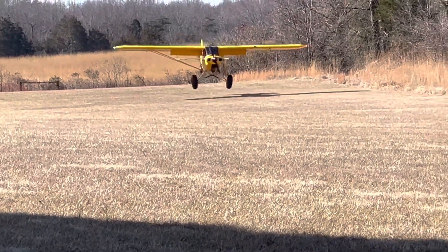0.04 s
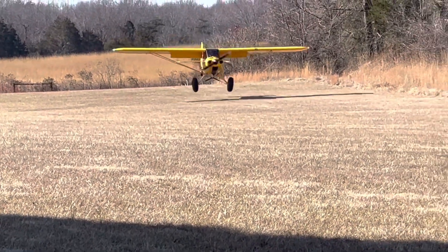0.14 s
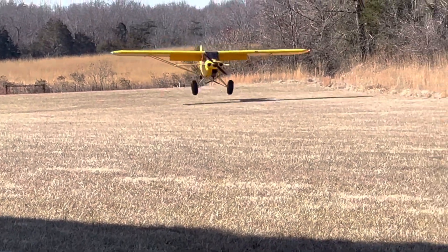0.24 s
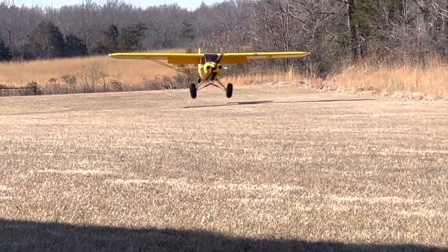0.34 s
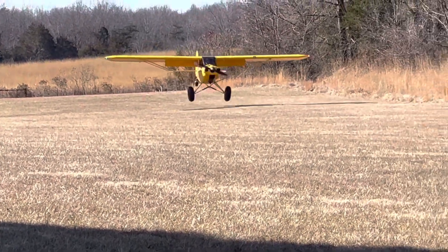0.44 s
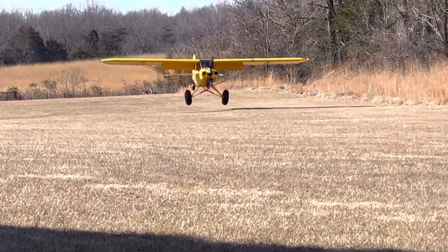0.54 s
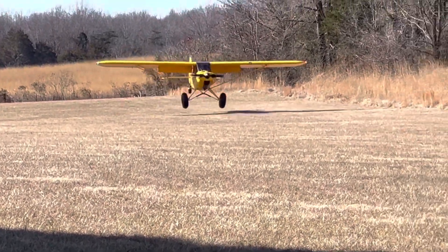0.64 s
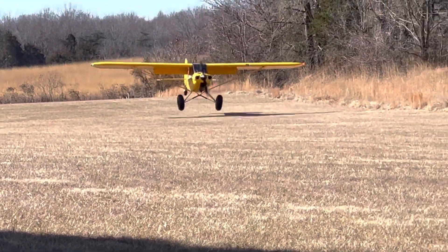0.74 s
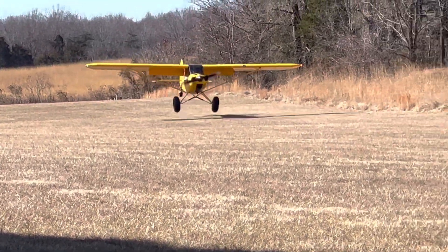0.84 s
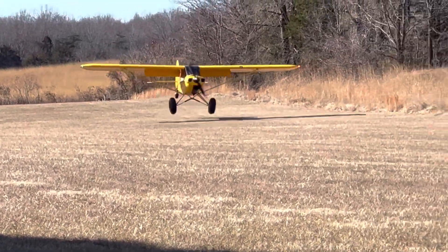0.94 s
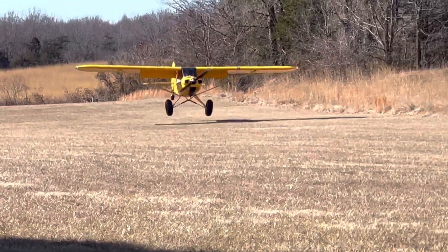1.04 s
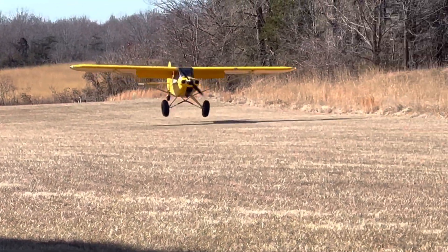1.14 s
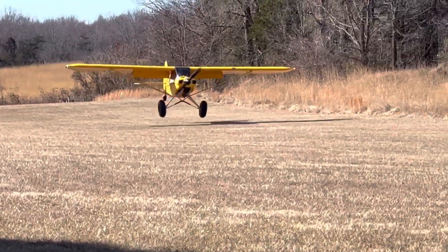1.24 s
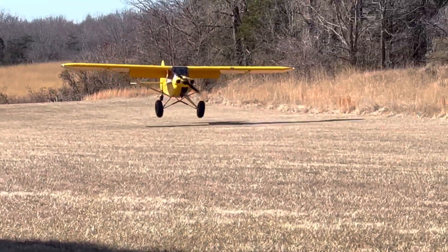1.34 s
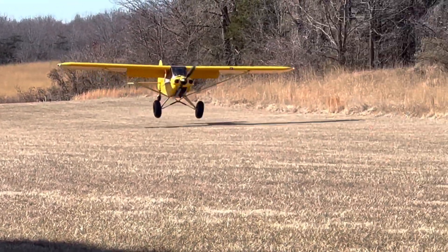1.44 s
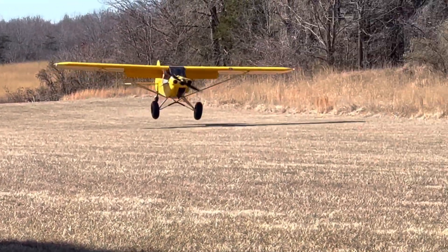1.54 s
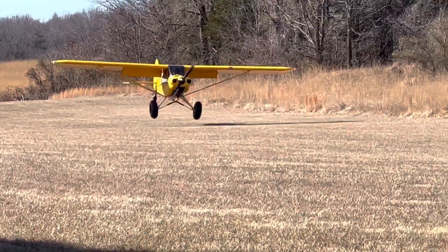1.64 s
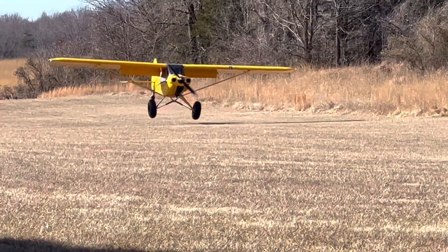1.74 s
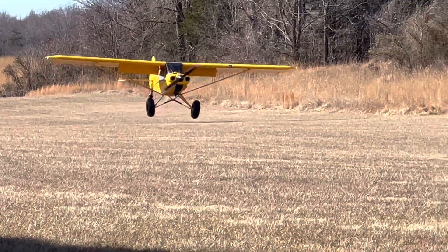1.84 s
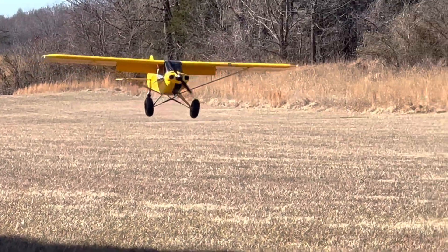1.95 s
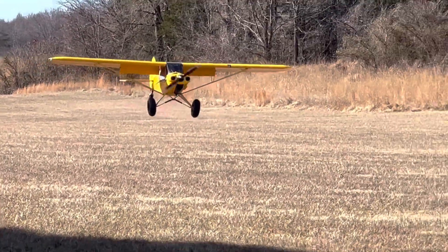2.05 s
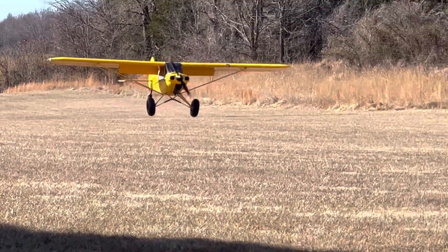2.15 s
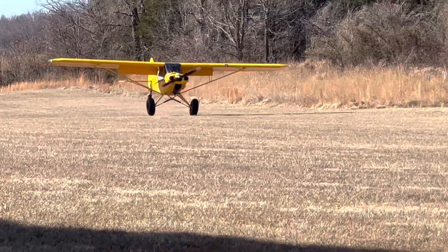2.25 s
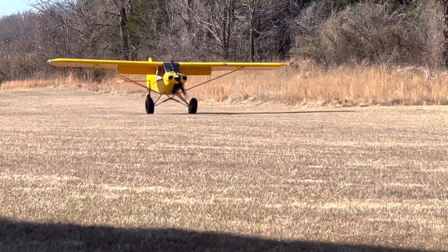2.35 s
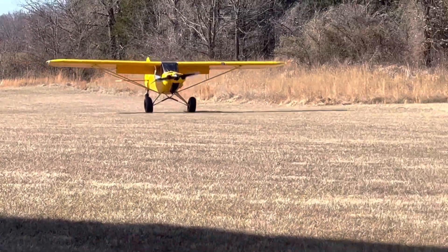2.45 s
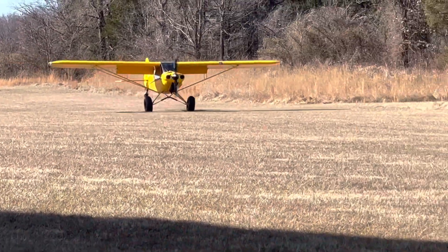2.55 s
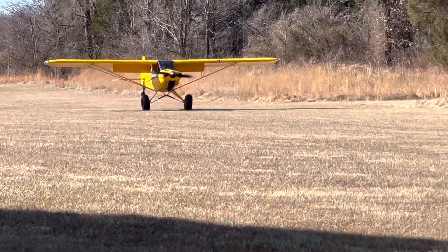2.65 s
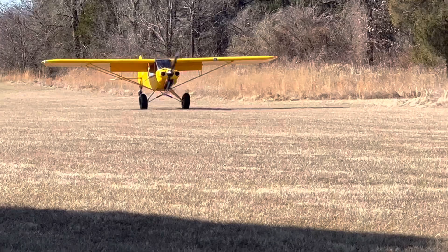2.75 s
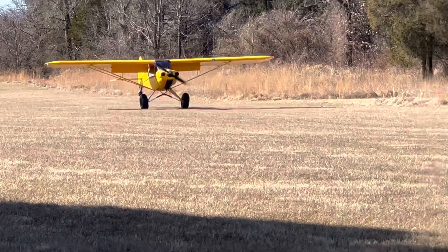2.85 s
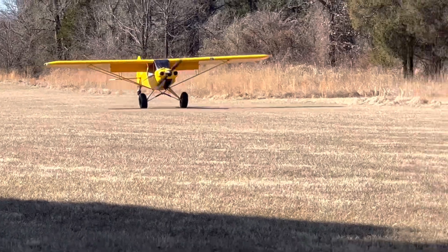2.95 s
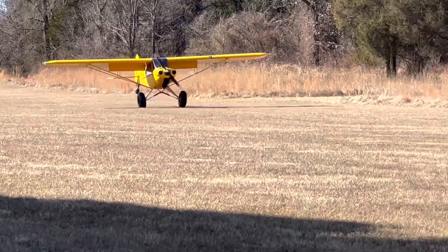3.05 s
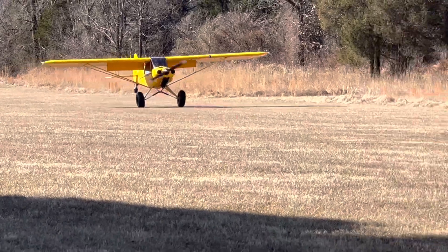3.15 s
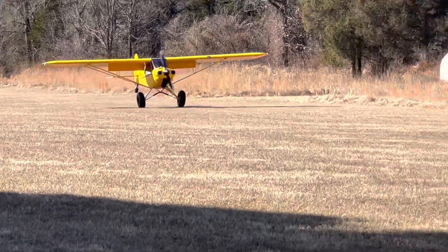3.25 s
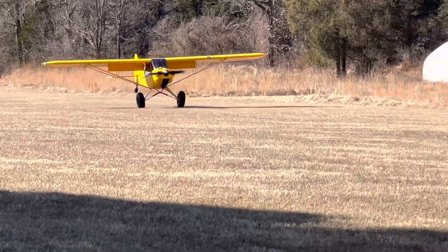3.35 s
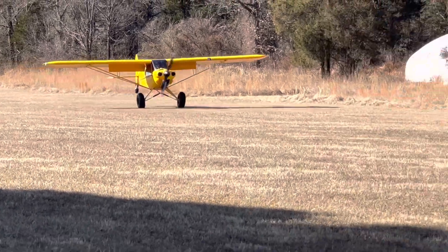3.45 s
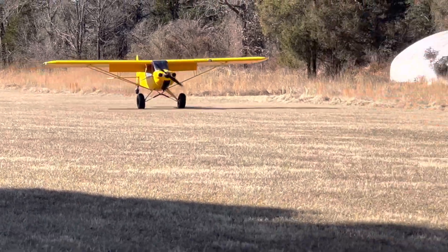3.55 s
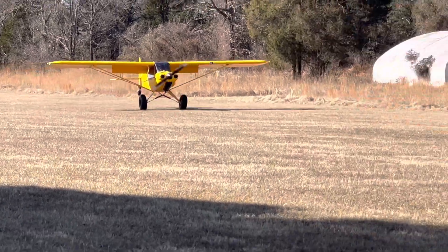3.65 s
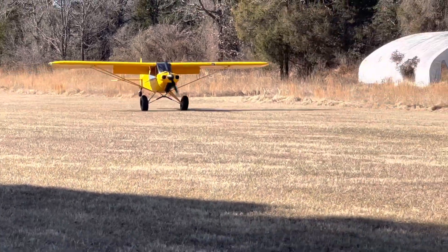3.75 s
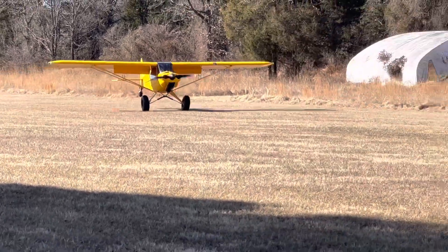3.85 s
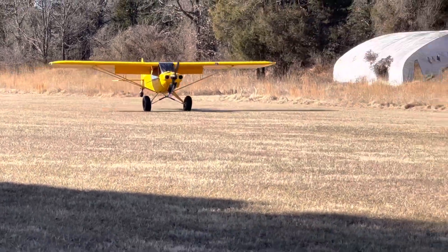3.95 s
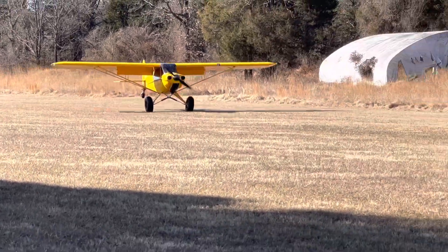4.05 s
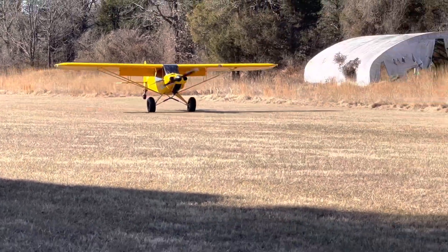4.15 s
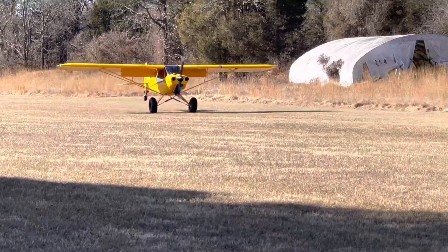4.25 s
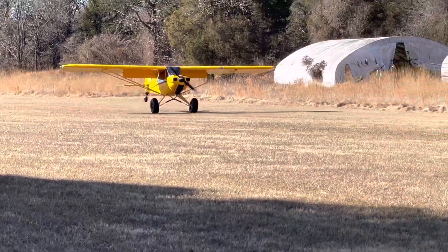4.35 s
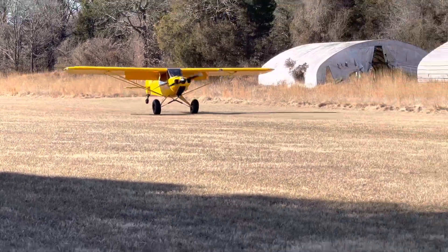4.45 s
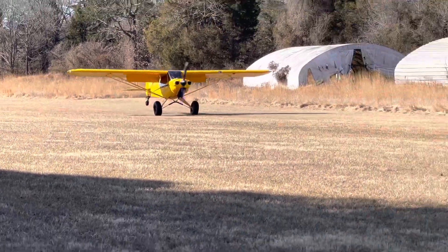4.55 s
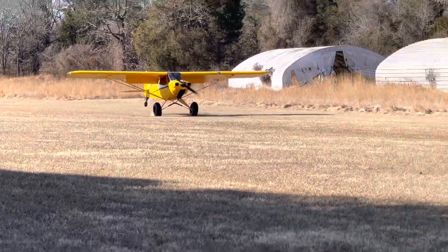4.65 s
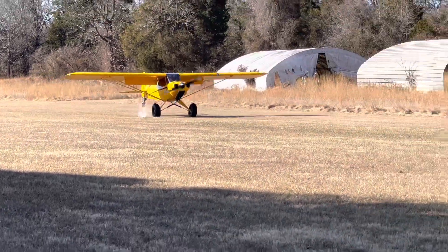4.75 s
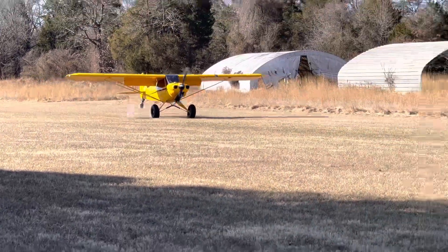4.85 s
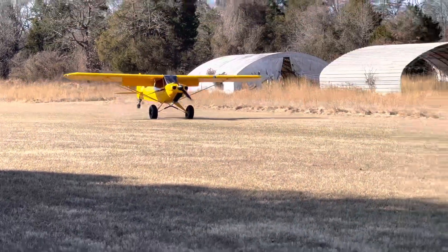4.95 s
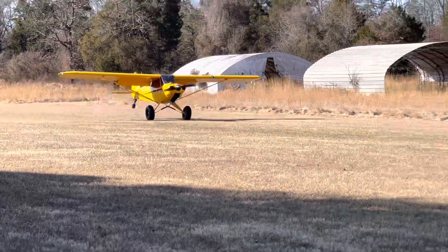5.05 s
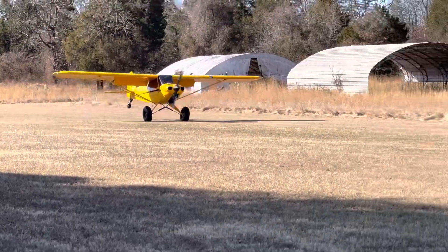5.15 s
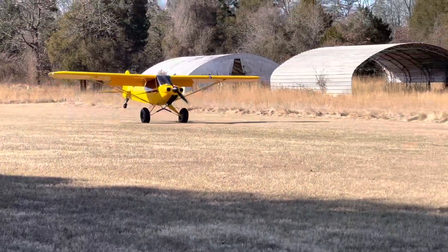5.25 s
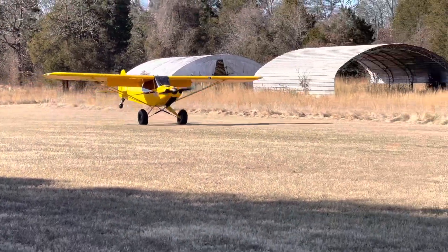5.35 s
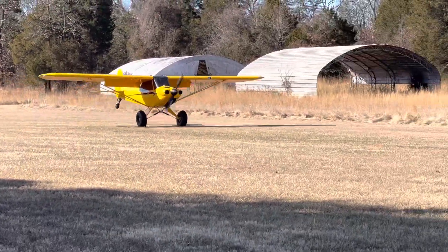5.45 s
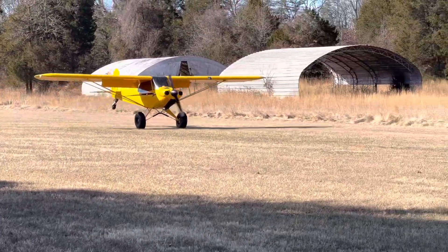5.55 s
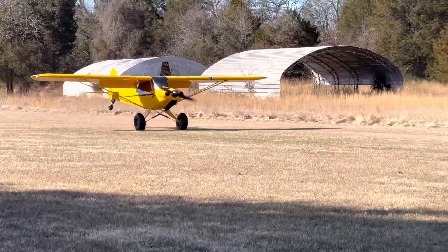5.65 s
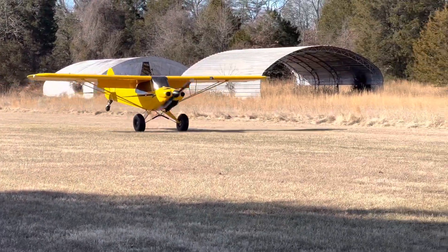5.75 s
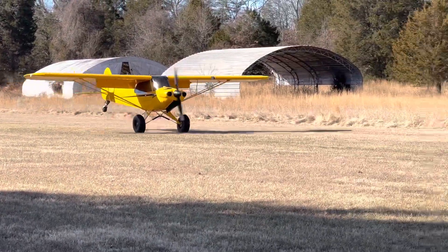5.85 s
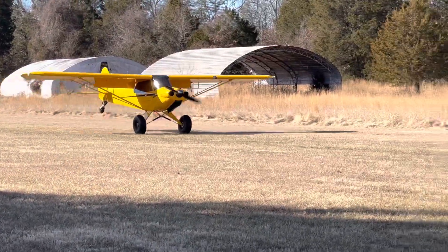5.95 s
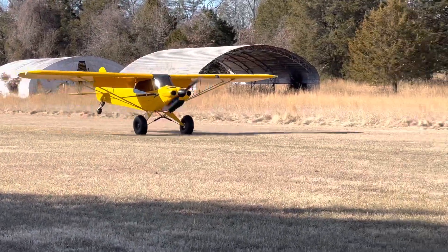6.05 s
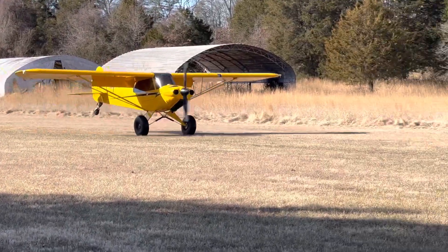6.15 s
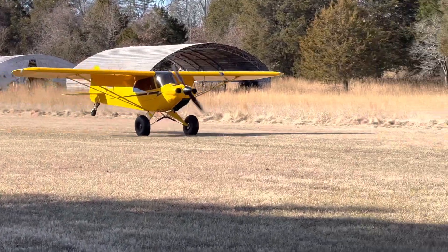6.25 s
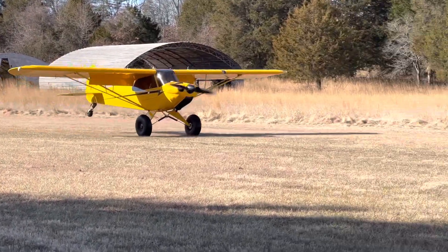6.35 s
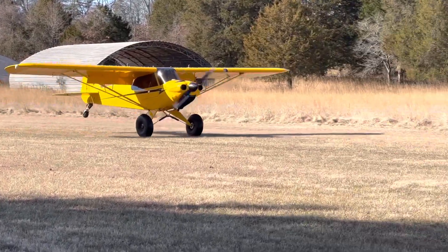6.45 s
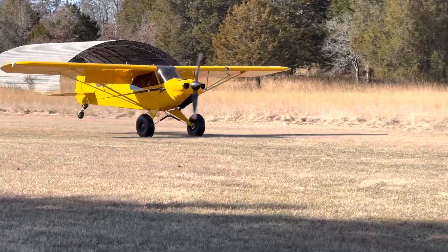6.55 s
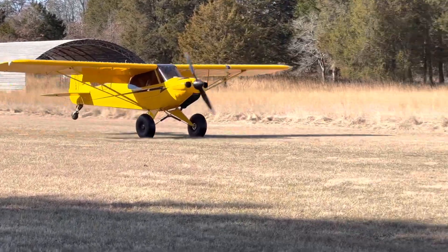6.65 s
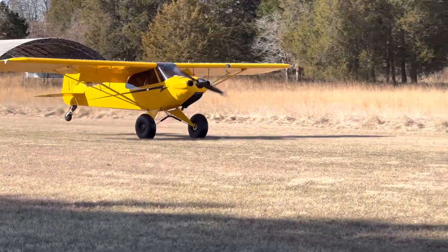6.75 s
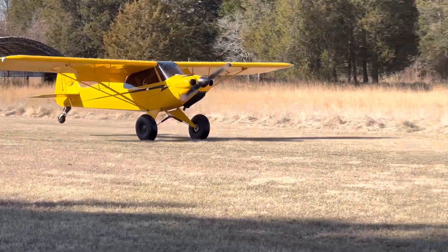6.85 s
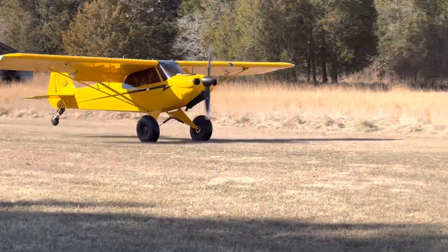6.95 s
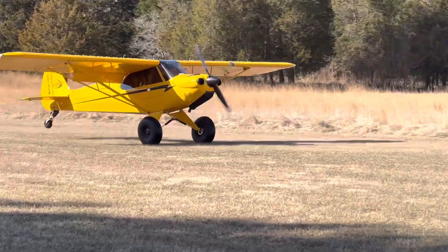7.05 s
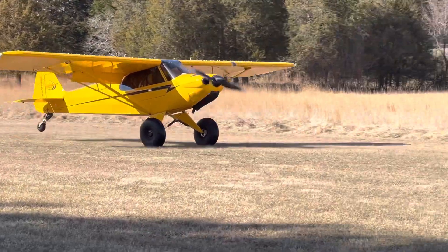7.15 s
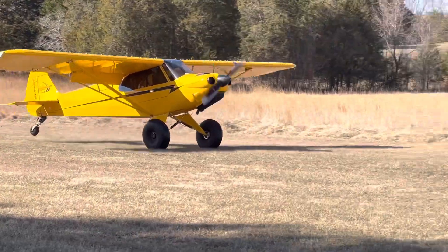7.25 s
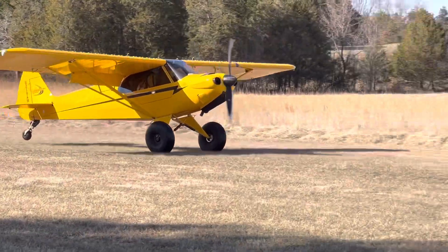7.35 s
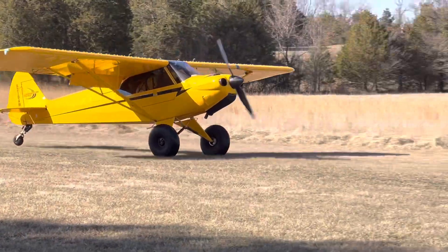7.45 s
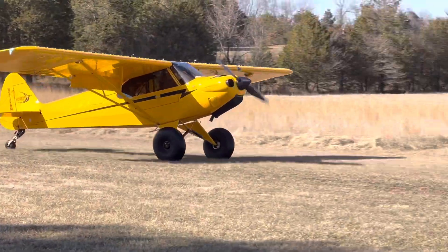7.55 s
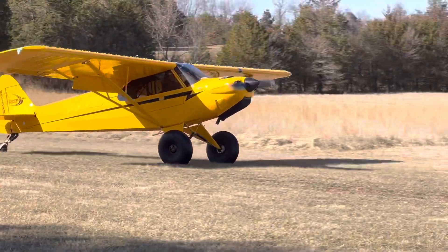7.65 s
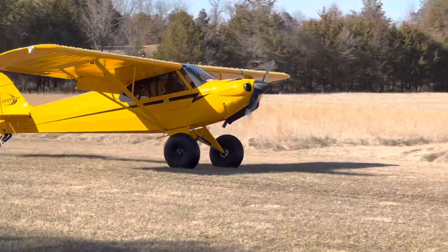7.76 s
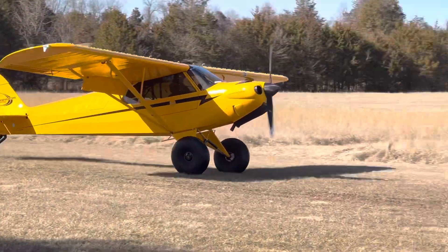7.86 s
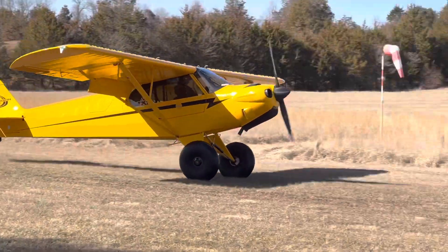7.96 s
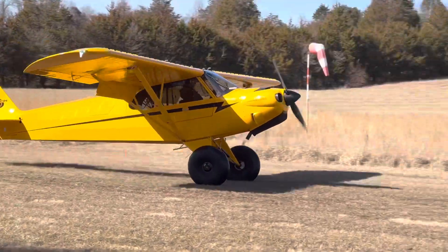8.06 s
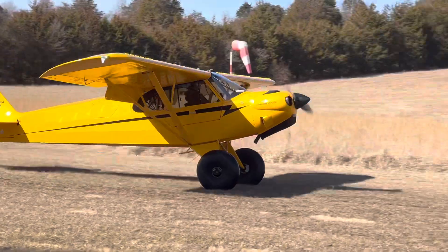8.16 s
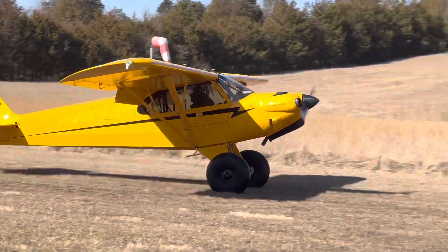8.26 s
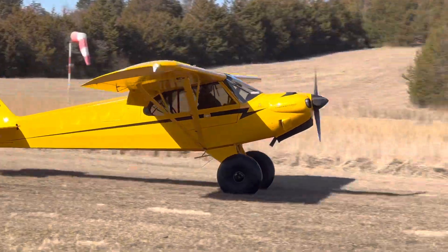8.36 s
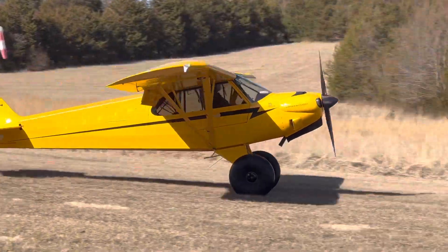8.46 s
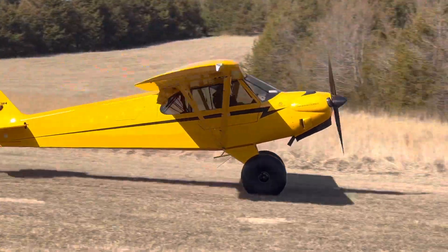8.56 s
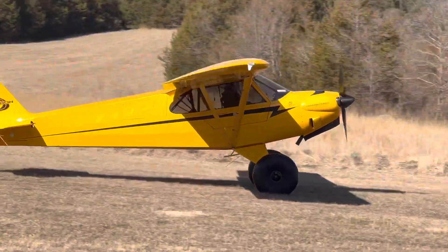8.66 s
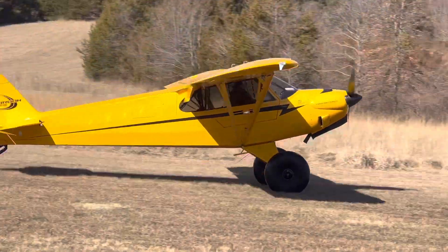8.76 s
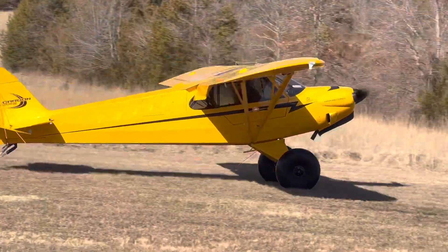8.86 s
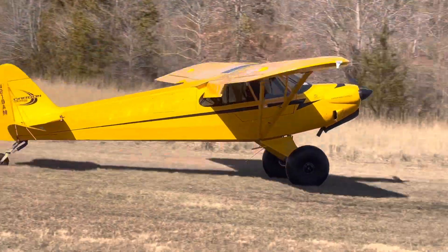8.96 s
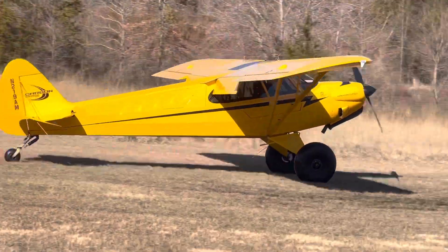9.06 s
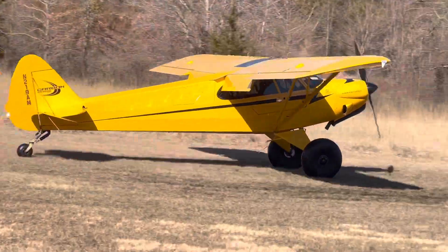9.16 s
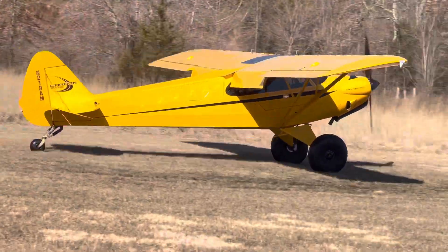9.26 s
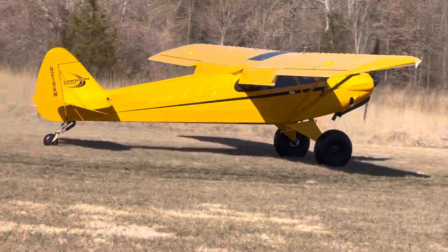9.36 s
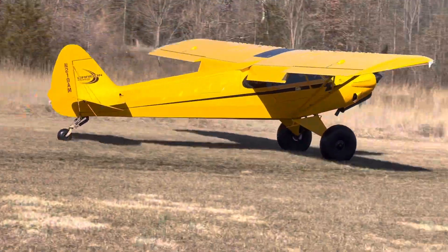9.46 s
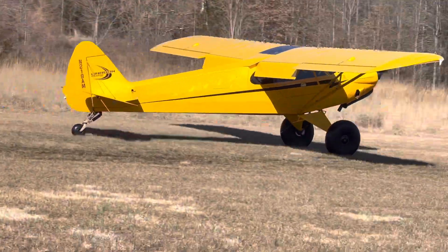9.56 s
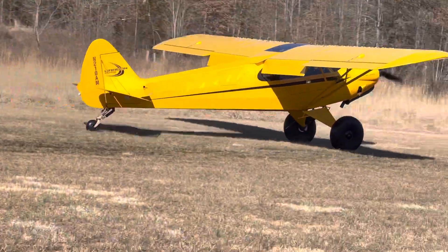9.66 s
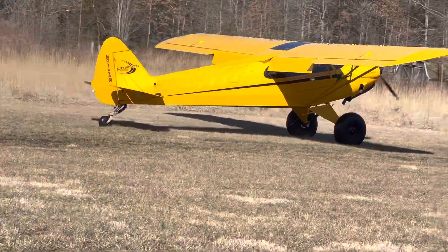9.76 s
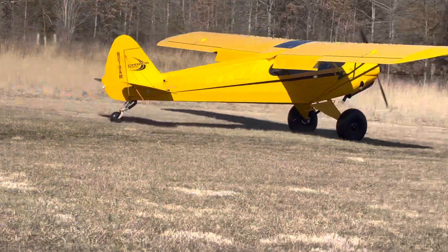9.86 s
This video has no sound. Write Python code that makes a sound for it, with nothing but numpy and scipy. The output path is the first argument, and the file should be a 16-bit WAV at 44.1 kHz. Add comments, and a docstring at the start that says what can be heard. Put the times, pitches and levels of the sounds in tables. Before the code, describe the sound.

A light propeller plane lands with its engine idling in uneven low putters and swishing blades, tyres hissing over dry grass as it rolls past.

```python
"""A light taildragger glides in, its four-cylinder engine idling slower and slower, over a breezy field.
Uneven firings boom in the exhaust, one cylinder chuffs, the two propeller blades swish and an edge whistles.
Thumps and two hollow pops come early, a bright whoosh just before touchdown, then tyres hiss on grass.
Shaped noise makes air and grass, pulses through resonances the exhaust; the plane rolls past 19 m away
amid clacks, thumps and exhaust barks, then draws away."""
import sys
import numpy as np
from scipy import signal
from scipy.fft import rfft, irfft
from scipy.io import wavfile
from scipy.ndimage import uniform_filter1d

SR = 44100
rng = np.random.default_rng(int(sys.argv[2]) if len(sys.argv) > 2 else 0)


def store_wav(level_fs):
    """Save 16-bit WAV to argv[1]."""
    pcm = np.round(np.clip(np.atleast_2d(level_fs), -1, 1) * 32767)
    wavfile.write(sys.argv[1], SR, pcm.T.astype(np.int16))


N = 436590
TIME = np.arange(N) / SR  # s
FREQS = np.maximum(np.arange(N // 2 + 1) * SR / N, 1)  # Hz

# straight run past the listener: speed, moment and distance of the closest approach
SPEED_M_S, PASSES_S, CLOSEST_M = 17.5, 8.48, 19.06

# firing rate; two firings and two blade passes to a turn of the shaft: [start_s, rate_hz]
FIRING_RATE = [(0.0, 27.26), (0.6, 27.7), (1.3, 27.46), (2.0, 26.69), (2.8, 26.13), (3.4, 26.05),
               (4.1, 25.32), (4.5, 24.78), (5.2, 24.6), (5.7, 24.14), (6.1, 24.48), (6.5, 23.42),
               (7.3, 23.48), (7.8, 22.34), (8.4, 21.73), (9.0, 21.06), (9.45, 20.8), (9.9, 21.03)]
# spectrum of low, churned air: [pitch_hz, level_db]
BUFFET_SPECTRUM = [(20, -24), (32, -11.5), (44, 2), (62, 4.5), (88, 5.5), (112, -3), (135, -7), (230, -39)]
# spectrum of a hard clack: [pitch_hz, level_db]
CLACK_SPECTRUM = [(700, -6), (1400, 5.5), (2500, 11), (4500, 8.5), (7000, -1.5), (15000, -27)]


def undb(db):
    """Decibels to gain."""
    return 10 ** (np.asarray(db) / 20)


def curves(table):
    """Each column of a table, joined by straight lines in time."""
    s, *columns = np.transpose(table)
    return [np.interp(TIME, s, c) for c in columns]


def unit(x):
    """Scale to rms 1."""
    return x / np.sqrt(np.mean(x ** 2))


def response(points):
    """Gain at every frequency from (Hz, dB) points, falling away beyond the ends."""
    hz, db = np.transpose(points)
    skirts = np.minimum(FREQS / hz[0], 1) * np.minimum(hz[-1] / FREQS, 1)
    return undb(np.interp(np.log(FREQS), np.log(hz), db)) * skirts ** 2


def noise(points):
    """Turbulence with the given spectrum, rms 1."""
    return unit(irfft(rfft(rng.standard_normal(N)) * response(points), N))


def lowpassed(rolloff):
    """White noise divided by a rolloff curve, as a slow random signal."""
    return irfft(rfft(rng.standard_normal(N)) / rolloff, N)


def walk(rate):
    """Smooth random drift with a spread near 1, given new values rate times a second."""
    k = int(SR / rate)
    steps = np.repeat(rng.standard_normal(N // k + 1), k)
    return unit(uniform_filter1d(uniform_filter1d(steps, k), k)[:N])


def steady(x, span):
    """Even out swells slower than span seconds."""
    return x / np.sqrt(uniform_filter1d(x ** 2, int(span * SR)))


def offset(phase, at, count):
    """Signed distance, in firings, from a point that comes round every count firings."""
    return (phase - at + count / 2) % count - count / 2


def bump(distance, width):
    """A smooth bell-shaped burst around distance zero."""
    return np.exp(-.5 * (distance / width) ** 2)


def swells(table):
    """Gain of smooth swells, each given as (s, half length s, dB)."""
    return undb(sum(db * bump(TIME - s, length) for s, length, db in table))


def resonance(hz, width):
    """Response of one damped resonator, gain 1 at its centre."""
    return 1 / (1 + 1j * (FREQS ** 2 - hz ** 2) / (FREQS * width))


def ringing(hz, width_hz, waver):
    """A resonance stirred by turbulence; its centre follows hz and wanders a little."""
    turn = 2 * np.pi * np.cumsum(hz * (1 + waver * walk(8))) / SR
    rolloff = 1 + (2 * FREQS / width_hz) ** 2
    a, b = lowpassed(rolloff), lowpassed(rolloff)
    return unit(a * np.cos(turn) + b * np.sin(turn))


def path():
    """Distance (m) and angle off the nose (degrees) from which the plane is heard."""
    ahead = SPEED_M_S * (PASSES_S - TIME)
    return np.hypot(ahead, CLOSEST_M), np.degrees(np.arctan2(CLOSEST_M, ahead))


def doppler(bearing):
    """Factor by which a pitch is raised as the plane comes and lowered as it goes."""
    sound_speed_m_s = 343
    return 1 / (1 - SPEED_M_S * np.cos(np.radians(bearing)) / sound_speed_m_s)


def gains(metres, bearing):
    """Bass spreads evenly all round; higher sounds are beamed and lose level over the grass."""
    # level of each low part: [level_db at the closest approach, fall_db per doubling of distance]
    bass_levels = {"rumble": (-34.5, 3.42), "drone": (-52, 3.84), "hum": (0.69, 4.92),
                   "wash": (-37.5, 5.28), "low rush": (-50.5, 8.1), "hoot": (-57, 8)}
    # angles off the nose, head-on to rear quarter: [bearing_degrees]
    bearings = [8, 25, 50, 90, 135]
    # level of each beamed part: [levels_db at those bearings and the closest distance, loss_db_per_m]
    beam_levels = {"rush": ([-44.5, -45, -52.5, -51, -46], .001),
                   "swish": ([-42.5, -49.5, -57.5, -57.5, -54], 0.17),
                   "chuff": ([-68.5, -52, -52.5, -54.5, -53], .05),
                   "growl": ([-44, -42, -54.5, -50.5, -51.5], 0.1),
                   "low ring": ([-55.5, -52.5, -48, -55, -58.5], .002),
                   "high ring": ([-58.5, -48.5, -55, -64, -56.5], 0.023),
                   "tyres": ([-52.5, -51.5, -56.5, -66, -57], 0.022), "tips": ([-67.5, -52, -58, -60, -55],
                   0.25), "whistle": ([-70, -63.5, -66, -72, -60.5], 0.16)}
    far = metres / CLOSEST_M
    gain = {}
    for part, (db, fall_db) in bass_levels.items():
        gain[part] = undb(db - fall_db * np.log2(far))
    for part, (db, loss) in beam_levels.items():
        grass_loss_db = loss * (metres - CLOSEST_M)
        gain[part] = undb(np.interp(bearing, bearings, db) - grass_loss_db) / far
    return gain


def breeze(db=-62.5):
    """Air moves over dry grass and trees, all around, as gusting noise that differs at each port."""
    # spectrum of the breeze: [pitch_hz, level_db]
    breeze_spectrum = [(25, 2), (50, 4), (100, 2), (180, 5), (250, -4), (300, 3.5), (400, -9), (520, -10),
                       (700, 7), (1200, 3), (1700, -13), (2400, -26.5), (4000, -27.5), (8000, -45)]
    gusts = undb(1.0 * walk(2.7))
    return undb(db) * gusts * np.array([noise(breeze_spectrum), noise(breeze_spectrum)])


def draught(db=-54, gust_db=1.5):
    """Moving air buffets each microphone port on its own, in short gusts common to both."""
    return undb(db + gust_db * walk(3.6)) * np.array([noise(BUFFET_SPECTRUM), noise(BUFFET_SPECTRUM)])


def hum(phase, waver_db=0.9, jitter_rad=.27):
    """Blades and firings hum on low multiples of the firing rate; the tones keep in step and throb."""
    # strength of a tone at each pitch, slid through as the engine slows: [pitch_hz, level_db]
    hum_curve = [(42, -44), (52, -46.5), (68, -35), (80, -36), (89, -43), (94, -47), (99, -56), (104, -33),
                 (113, -33.5), (121, -32.5), (131, -40), (138, -50)]
    # extra weight of the tones at 2, 3, 4 and 5 times the firing rate: [level_db]
    order_weights = [-8, 1.5, -0.5, 0.5]
    rate, = curves(FIRING_RATE)
    hz, db = np.transpose(hum_curve)
    out = np.zeros(N)
    for k, order_db in enumerate(order_weights, start=2):
        level_db = np.interp(k * rate, hz, db) + order_db + waver_db * walk(8)
        angle = 2 * np.pi * k * phase + jitter_rad * walk(14)
        out += np.sqrt(2) * undb(level_db) * np.cos(angle)
    return out


def firings(phase, scatter_db=3.0, jitter_s=0.00048):
    """One pulse per firing, a little uneven in size and timing."""
    # strength of each cylinder in firing order: [level_db]
    cylinder_levels = [1, -0.3, -1.2, -0.014]
    starts = np.flatnonzero(np.diff(np.floor(phase)) > 0)
    chance = rng.standard_normal((len(starts), 2))
    when = np.clip(starts + jitter_s * SR * chance[:, 0], 0, N - 1).astype(int)
    pulses = np.zeros(N)
    pulses[when] = undb(np.resize(cylinder_levels, len(starts)) + scatter_db * chance[:, 1])
    return pulses


def exhaust(pulses, modes):
    """Firings ring the exhaust; the muffler dulls both the lowest and the highest sound."""
    pipe = 0
    for k, (hz, width, db) in enumerate(modes):
        pipe = pipe + (-1) ** k * undb(db) * resonance(hz, width)  # neighbours alternate in sign
    high_cut = 1 / (1 + (FREQS / modes[-1][0] / 0.65) ** 6)
    low_cut = 1 / (1 + (140 / FREQS) ** 6)
    return unit(irfft(rfft(pulses) * pipe * high_cut * low_cut, N))


def pipes(phase, shift):
    """Body and growl of the exhaust; their resonances sink by the Doppler shift as the plane goes by."""
    # resonances of the pipe's body: [pitch_hz, width_hz, level_db]
    body_modes = [(171.7, 33, -1), (294, 40, 4.5), (350, 16, -12)]
    # resonances of the growl: [pitch_hz, width_hz, level_db]
    growl_modes = [(287, 140, -3), (527, 25, 0.5), (760, 130, -6.5)]
    clock, samples = np.cumsum(shift / shift.mean()), np.arange(N)
    # firings are spread onto the source's clock, so that only the resonances shift on the way back
    fired = firings(np.interp(samples, clock, phase))
    return [np.interp(clock, samples, exhaust(fired, modes)) for modes in (body_modes, growl_modes)]


def chuff(phase, shift, attack=0.08, decay=1.0, scatter_db=1.0, slap_db=-10, slap_width=0.1,
          ring_hz=1420, ring_db=-3):
    """Once in four firings one cylinder slaps brightly and puffs rasping gas with a wandering ring."""
    # spectrum of the puff: [pitch_hz, level_db]
    puff_spectrum = [(500, -40.5), (1000, 1.5), (1300, 11), (1550, 3), (1950, 2), (2400, -23), (5000, -41)]
    age = (phase - 2.93) % 4  # attack, decay and slap width are in firings too
    ring = ringing(ring_hz * shift, 110, .09)
    envelope = (1 - np.exp(-age / attack)) * np.exp(-age / decay)
    puff = envelope * (noise(puff_spectrum) + undb(ring_db) * ring)
    slap = undb(slap_db) * bump(offset(phase, 2.94, count=4), slap_width) * noise(CLACK_SPECTRUM)
    return unit((puff + slap) * undb(scatter_db * walk(12)))


def drone():
    """A low, wavering resonance of the exhaust pipe sings on between firings."""
    # the tone: [pitch_hz, width_hz, waver as a share of the pitch]
    hz, width_hz, waver = (298, 7.1, .02)
    return steady(ringing(hz, width_hz, waver), .3)


def hoot(phase, shift, lag=2.11, length=.55, rise=.025):
    """Once in every four firings the pipe gives a short, faint hoot that bends upward."""
    # the tone before Doppler and bend: [pitch_hz, width_hz, waver as a share of the pitch]
    hz, width_hz, waver = (510, 34, .025)
    distance = offset(phase, lag, count=4)
    tone = ringing(hz * shift * (1 + rise * distance), width_hz, waver)
    return unit(bump(distance, length) * steady(tone, 0.072))


def rumble(flutter_db=1.5, flutter_rate=13, surge_length_s=0.062):
    """Churned air rumbles unevenly, with short surges and lulls."""
    # strongest surges and lulls, all equally short: [peak_s, level_db]
    surge_moments = [(0.07, 7), (.38, 8), (.72, -3.5), (1.12, 6), (1.3, 6.5), (1.47, 0), (1.92, 4),
                     (2.16, 7), (2.29, -8.5), (2.53, 6.5), (3.1, 2), (3.28, 5.5), (3.52, 2.5), (3.72, 6.5),
                     (4.01, 6), (4.34, 1), (4.5, 5.5), (5.45, -8), (6.3, 2.5), (7.14, 3.5), (7.39, 5.5),
                     (7.85, -0.5), (8.06, -2), (8.45, -3), (9.15, 2.5), (9.8, 4.5)]
    surges = swells([(s, surge_length_s, db) for s, db in surge_moments])
    return steady(noise(BUFFET_SPECTRUM), 0.12) * undb(flutter_db * walk(flutter_rate)) * surges


def wash(body):
    """Low rushing air blends with the boom of the exhaust's body."""
    # spectrum of the air: [pitch_hz, level_db]
    wash_spectrum = [(100, -9), (160, 0.5), (200, -4.5), (250, -6), (305, -6.5), (370, -12), (430, -17.5),
                     (510, -19.5), (620, -23.5), (1100, -47)]
    return undb(-1.0) * noise(wash_spectrum) + undb(-5.5) * body


def blades(phase, depth, lead=0.052, uneven=0.17, sharp=.3):
    """Short swell of the air noise as each blade comes round; one blade is louder."""
    turn = 2 * np.pi * (phase + lead)
    passes = 1 + np.clip(depth, 0, 1) * (np.cos(turn) + sharp * np.cos(2 * turn))
    return unit(passes * (1 - uneven * depth * np.cos(np.pi * phase)))


def low_rush(phase, depth):
    """Mid-low air noise is gently chopped by the passing blades."""
    # spectrum of the air: [pitch_hz, level_db]
    low_rush_spectrum = [(300, -2.5), (500, -1), (700, 4), (900, 5.5), (1150, 0.5), (1800, -15.5)]
    return undb(1.0 * walk(18)) * noise(low_rush_spectrum) * blades(phase, 0.45 * depth)


def cowling(shift, hz=1280, width_hz=330):
    """Engine noise rings in the cowling, as a wavering, Doppler-shifted band of noise."""
    return ringing(hz * shift, width_hz, waver=.025)


def rush(phase, depth, shift, swell, gain):
    """Air noise and the cowling's two rings are chopped together by the blades."""
    # spectrum of the air: [pitch_hz, level_db]
    rush_spectrum = [(600, -10.5), (1000, -6.5), (1180, -1), (1340, -2), (1600, -2), (1950, -4),
                     (2250, -5.5), (2700, -8), (4000, -30.5)]
    air = np.sqrt(swell) * gain["rush"] * undb(-3.5) * noise(rush_spectrum)
    low_ring = gain["low ring"] * cowling(shift)
    high_ring = swell * gain["high ring"] * cowling(shift, hz=1779, width_hz=370)
    grains = undb(1.0 * walk(70))  # breaks it into rasping grains
    return (air + low_ring + high_ring) * blades(phase, 0.64 * depth) * grains


def swish(phase, depth):
    """Bright air noise swells as each blade passes."""
    # spectrum of the swish: [pitch_hz, level_db]
    swish_spectrum = [(1500, -14), (2300, -8), (2900, 8.5), (3500, 9.5), (4400, 4), (4950, 0),
                      (5400, -10.5), (6500, -31), (9000, -53)]
    return undb(1.1 * walk(25)) * noise(swish_spectrum) * blades(phase, depth)


def tips(phase, depth):
    """The blade tips hiss in the high treble as they pass."""
    # spectrum of the tips: [pitch_hz, level_db]
    tip_spectrum = [(5000, 8.5), (7400, 6.5), (9000, 2), (11500, 2), (13500, 0), (15500, -8)]
    passes = blades(phase, 1.11 * depth, lead=-0.062, uneven=-0.032)
    return undb(1.0 * walk(25)) * noise(tip_spectrum) * passes


def whistle(phase, bearing, glide_hz=1100, width_hz=430, other_db=-7, lag=0.91):
    """A propeller edge whistles once a turn, a shorter, softer one between; the motion sweeps the pitch."""
    # middle pitch heard from each side: [bearing_degrees, pitch_hz]
    whistle_pitch = [(13, 7200), (25, 7900), (90, 8300)]
    distance = offset(phase, lag, count=2)
    other = undb(other_db) * bump(offset(phase, lag + 1, count=2), 0.031)
    burst = bump(distance, 0.17) + other
    middle_hz = np.interp(bearing, *np.transpose(whistle_pitch))
    hz = middle_hz + glide_hz * np.sin(2 * np.pi * distance) / 2
    flutter = lowpassed(1 + (FREQS / width_hz) ** 4)
    tone = flutter * np.cos(2 * np.pi * np.cumsum(hz) / SR)
    return unit(burst * undb(1.0 * walk(13)) * tone)


def tyres(grain_db=2.0):
    """Dry grass crackles finely under wheels that brush it, skip and then settle."""
    # spectrum of the crackle: [pitch_hz, level_db]
    hiss_spectrum = [(2500, 7), (4200, 6.5), (5300, 0.5), (6200, 2.5), (7000, -4), (8500, -7.5),
                     (11500, -17.5), (15500, -29)]
    # how firmly the wheels touch: [start_s, contact_db]
    wheel_contact = [(0, -28), (2.0, -23.5), (2.45, -7.5), (2.95, -15), (3.5, -11), (3.85, 0), (4.7, 0.5),
                     (4.95, 5), (5.6, 0)]
    crackle = unit(noise(hiss_spectrum) * undb(grain_db * walk(500) + 1.0 * walk(13)))
    return undb(curves(wheel_contact)[0]) * crackle


def knocks():
    """The airframe knocks: dull sine thumps, and short noise clacks with a very faint hollow ring."""
    # clacks: [start_s, clack_db, ring_db relative to the clack, decay_s]
    clack_events = [(2.462, -65, -64, 0.0054), (6.272, -54, -60, .008), (6.353, -50.5, -61, 0.03),
                    (6.440, -51, -52, 0.0093), (6.609, -48, -45, 0.014), (7.639, -44.5, -61, 0.012),
                    (8.177, -48.5, -84, 0.0092), (8.729, -43, -37, 0.02), (9.103, -43.5, -56, .014)]
    # spectrum of the hollow ring: [pitch_hz, level_db]
    ring_spectrum = [(150, -14), (350, -10), (550, 7), (740, 0), (950, -7), (1700, -17), (2500, -28)]
    # thumps: [peak_s, pitch_hz, level_db, half_length_s]
    thump_events = [(1.306, 73, -27.5, 0.013), (1.581, 75, -31, 0.012), (1.748, 85, -26, 0.0092),
                    (2.479, 59, -36, 0.011), (6.384, 60.5, -20.5, 0.0075), (6.649, 67.5, -25, 0.014),
                    (7.682, 71, -19, 0.01), (8.767, 67, -17.5, 0.016), (9.421, 63.6, -17.5, 0.0047)]
    clack, ring, out = noise(CLACK_SPECTRUM), noise(ring_spectrum), np.zeros(N)
    for s, db, ring_db, decay in clack_events:
        span = slice(int(s * SR), int(s * SR) + SR // 10)
        fade = np.exp(-(TIME[span] - s) / decay)
        out[span] += undb(db) * fade * (clack[span] + undb(ring_db) * ring[span])
    for s, hz, db, length in thump_events:
        out += undb(db) * bump(TIME - s, length) * np.sin(2 * np.pi * hz * (s - TIME))
    return out


def pops():
    """Two dull, hollow pops, one soft and one firm; each mode swells and dies within a few cycles."""
    # pops: [start_s, level_db, pitch_factor]
    pop_events = [(1.4685, -53, 1), (1.7335, -40.5, .92)]
    # modes before the pitch factor: [pitch_hz, level_db relative to the pop, decay_s]
    pop_modes = [(260, 1, .003), (430, -6, .002), (560, 2, .0015), (700, -2, .0013), (1600, -5, .0005)]
    out = np.zeros(N)
    for s, pop_db, pitch in pop_events:
        age = np.clip(TIME - s, 0, 1)
        for hz, db, decay in pop_modes:
            envelope = age / decay * np.exp(1 - age / decay)
            out += undb(pop_db + db) * envelope * np.sin(2 * np.pi * hz * pitch * age)
    return out


def flare():
    """The air whooshes briefly and brightly as the nose lifts before touchdown."""
    # the whoosh: [peak_s, half_length_s, level_db]
    s, length, db = (1.68, 0.13, -61)
    # its spectrum: [pitch_hz, level_db]
    whoosh_spectrum = [(1000, -9.5), (1600, 5), (2400, 3.5), (3300, -24)]
    return undb(db) * bump(TIME - s, length) * noise(whoosh_spectrum)


def barks(width_hz=220):
    """The hardest firings bark in the exhaust, each a short, rough tone at its own pitch."""
    # barks: [peak_s, pitch_hz, level_db, half_length_s]
    bark_events = [(6.972, 1315, -52, 0.016), (7.856, 1255, -51, 0.023), (8.008, 1373, -52, 0.015),
                   (8.56, 1262, -44.5, 0.0081), (8.735, 1406, -43.5, 0.0069), (8.79, 1380, -51, 0.0072),
                   (8.93, 1870, -48.5, 0.0086), (9.159, 1220, -50, .009), (9.312, 1330, -51, .015),
                   (9.505, 1467, -48, 0.018), (9.702, 1410, -49.5, 0.012)]
    jitter = unit(lowpassed(1 + (2 * FREQS / width_hz) ** 2))
    out = np.zeros(N)
    for s, hz, db, length in bark_events:
        span = slice(int((s - 4 * length) * SR), int((s + 4 * length) * SR))
        age = TIME[span] - s
        tone = np.sin(2 * np.pi * hz * age + 1.5 * jitter[span])
        out[span] += np.sqrt(2) * undb(db) * bump(age, length) * tone
    return out


def ports(x, spread_s=.137):
    """Two ports hear the plane slightly out of phase, with a late, opposite-signed copy that widens the stereo."""
    # strength of the late copy: [pitch_hz, level_db]
    spread_spectrum = [(25, -24), (120, -44), (350, -39.5), (650, -13), (1200, -27.5), (2200, -35.5),
                       (3500, -20.5), (6000, -37), (8500, -12.5), (11000, -4.5), (13500, -6.5)]
    # share of the sound that differs between the ports: [pitch_hz, level_db]
    port_difference = [(30, -32), (350, -58.5), (520, -14), (700, -17), (1050, -29.5), (1300, -13),
                       (2300, -50.5), (3100, -9), (4100, -10.5), (5200, -55), (7000, -41.5), (8300, 0.5),
                       (11000, 9.5), (13000, -16.5)]
    late = np.interp(TIME - spread_s, TIME, irfft(rfft(x) * response(spread_spectrum), N), left=0)
    # a quarter-cycle shift; it and the late copy have opposite signs at the two ports
    side = irfft(rfft(x) * 1j * response(port_difference), N) + late
    return np.array([x + side, x - side])


def scene():
    """The shaft angle drives exhaust and propeller; distance and bearing set their levels."""
    # how deeply the blades chop the air noise from each side: [bearing_degrees, depth 0-1]
    chop_depth = [(7, 0.06), (10, 0.32), (12, 0.48), (15, 0.69), (23, 0.24), (48, 0.45), (75, 0.09),
                  (100, 0.46), (139, 0.41)]
    # brief swells of the blades' bright sound: [peak_s, half_length_s, level_db]
    swell_moments = [(.42, 0.11, 6), (1.15, 0.19, 4.5), (1.69, 0.2, 5), (2.35, 0.27, 5.5), (3.88, 0.14, 1),
                     (4.95, 0.5, 1), (5.5, 0.26, 1)]
    phase = np.cumsum(curves(FIRING_RATE)[0]) / SR  # counted in firings
    metres, bearing = path()
    gain = gains(metres, bearing)
    depth = np.interp(bearing, *np.transpose(chop_depth))
    shift = doppler(bearing)
    swell = swells(swell_moments)
    body, growl = pipes(phase, shift)

    engine = gain["hum"] * hum(phase) + gain["growl"] * growl
    engine += gain["chuff"] * chuff(phase, shift)
    engine += gain["drone"] * drone() + gain["hoot"] * hoot(phase, shift)

    air = gain["rumble"] * rumble() + gain["wash"] * wash(body)
    air += gain["low rush"] * low_rush(phase, depth)
    air += rush(phase, depth, shift, swell, gain)
    air += swell * gain["swish"] * swish(phase, depth) + flare()

    treble = gain["tyres"] * tyres() + gain["tips"] * tips(phase, depth)
    treble += gain["whistle"] * whistle(phase, bearing)
    plane = engine + air + treble + knocks() + barks() + pops()
    return ports(plane) + breeze() + draught()


def record(dry):
    """A narrow band of treble is lost, the ends fade and a steep filter cuts the top."""
    notch_hz, notch_width_hz, top_hz, edge_s = 10000, 560, 15740, .012
    notch = 1 - .97 * np.exp(-((FREQS - notch_hz) / notch_width_hz) ** 4)
    fade = np.clip(np.minimum(TIME, TIME[::-1]) / edge_s, 0, 1) ** 2
    heard = irfft(rfft(dry) * notch, N) * fade
    return signal.sosfilt(signal.ellip(10, .2, 80, top_hz, fs=SR, output="sos"), heard)


dry = scene()
out = record(dry)
store_wav(out)
```